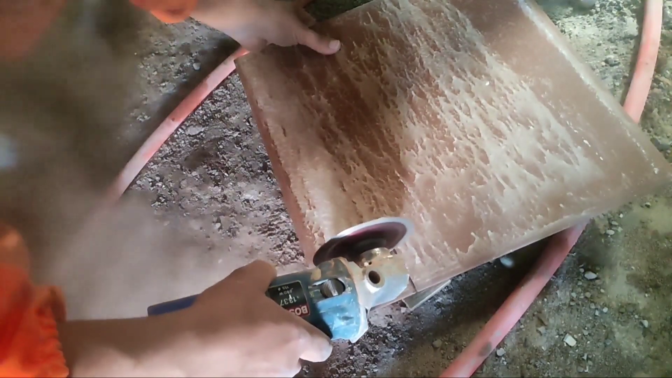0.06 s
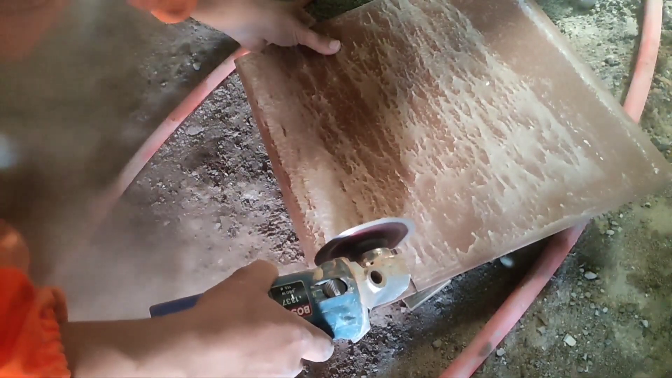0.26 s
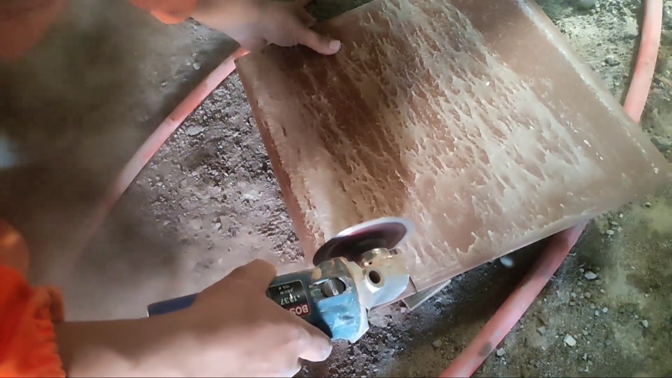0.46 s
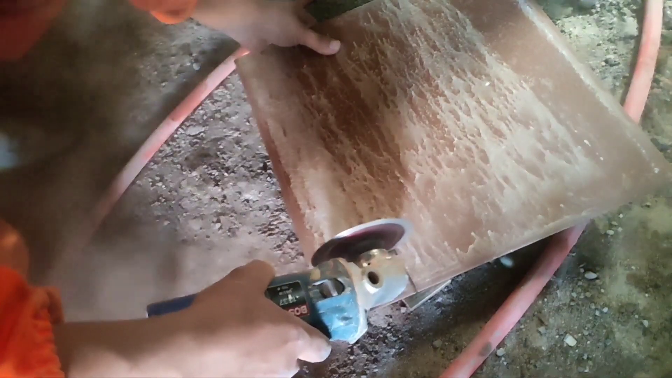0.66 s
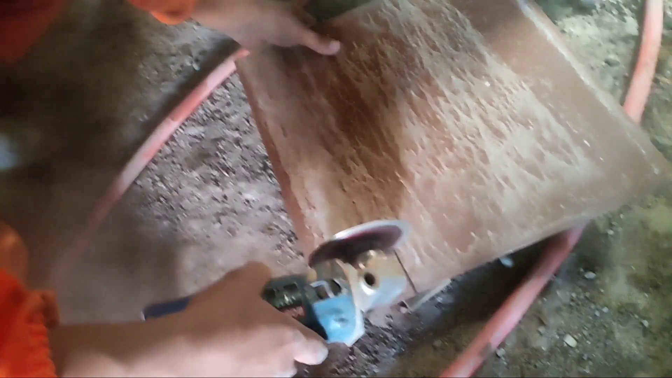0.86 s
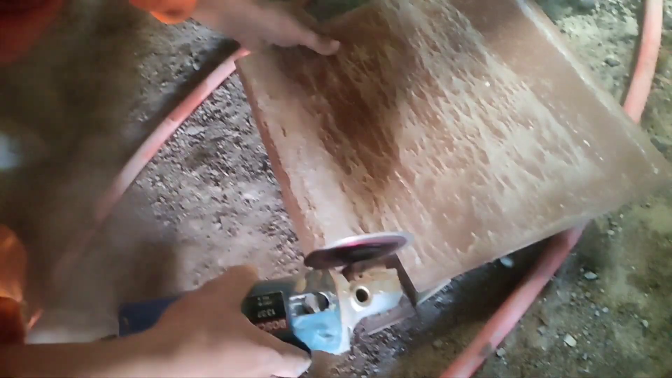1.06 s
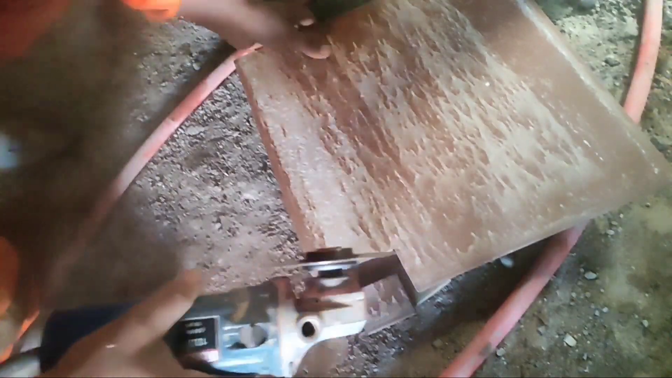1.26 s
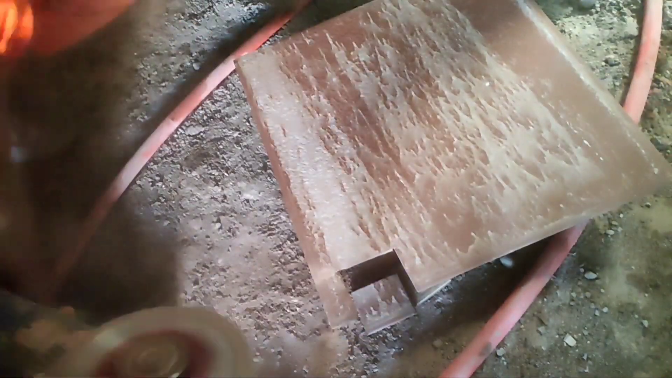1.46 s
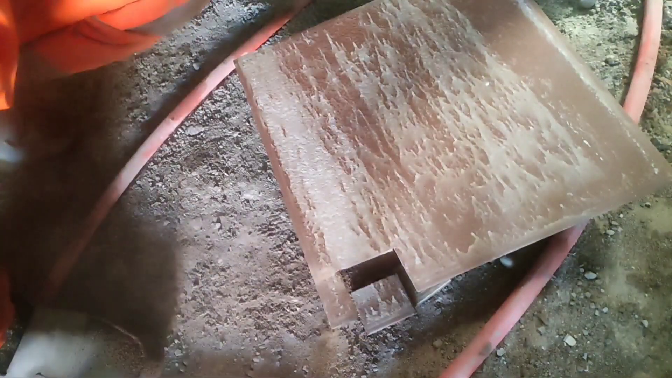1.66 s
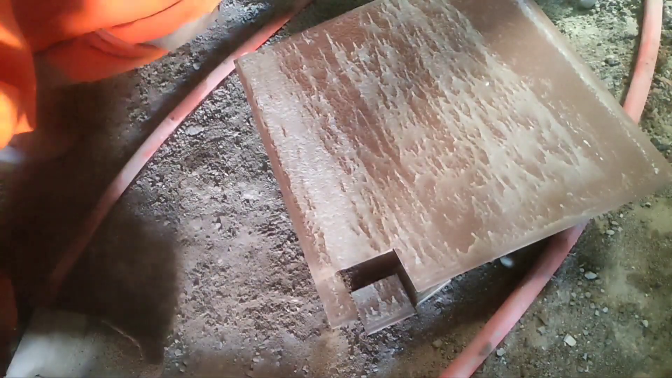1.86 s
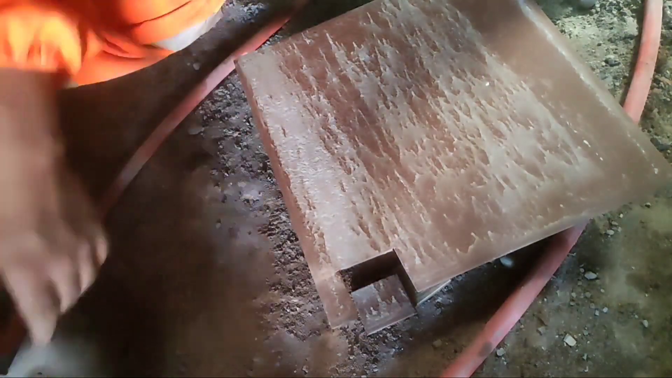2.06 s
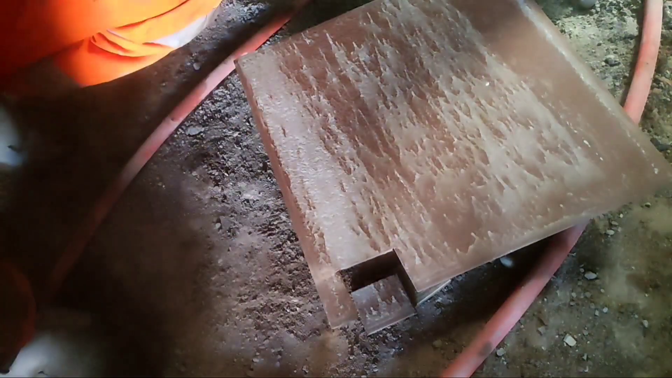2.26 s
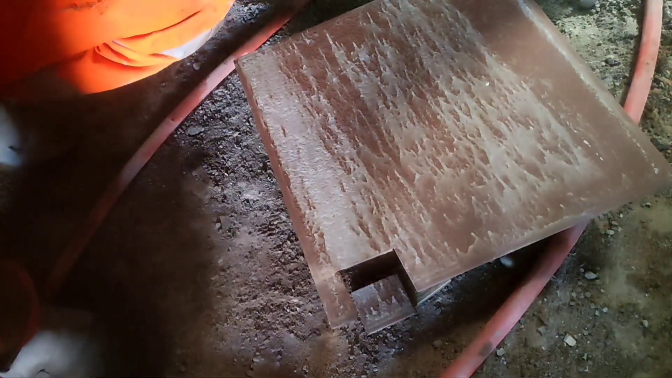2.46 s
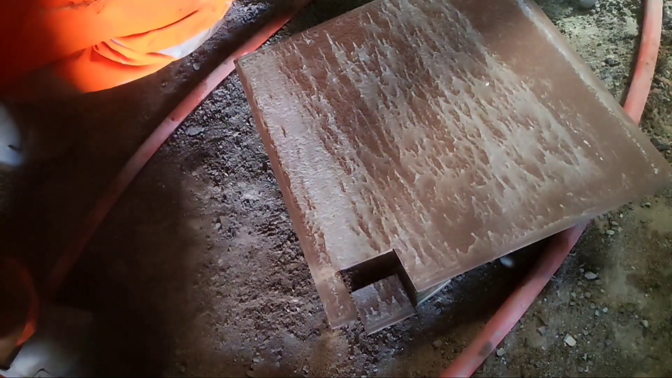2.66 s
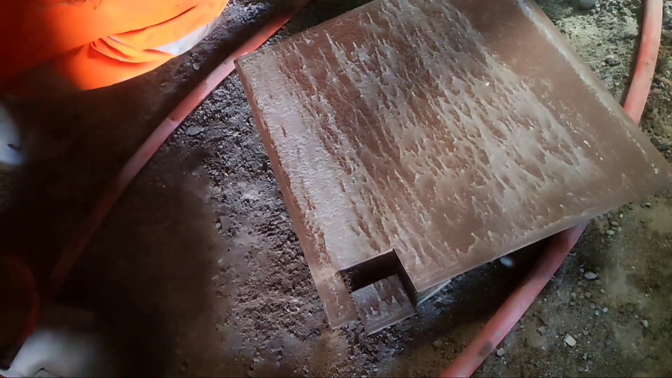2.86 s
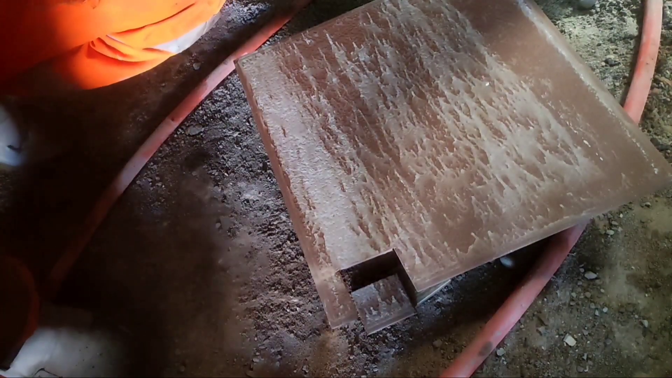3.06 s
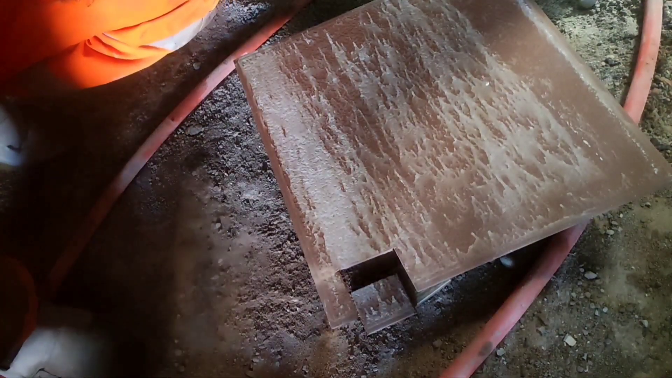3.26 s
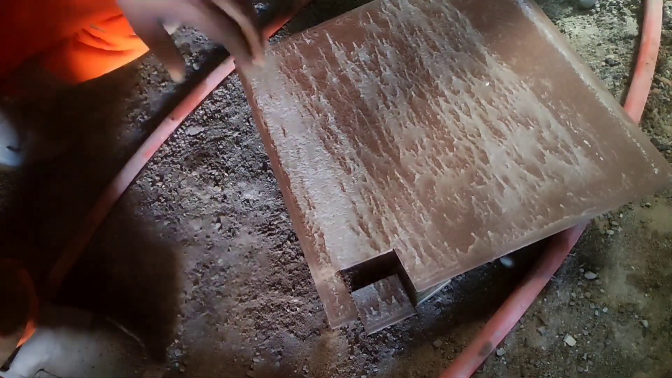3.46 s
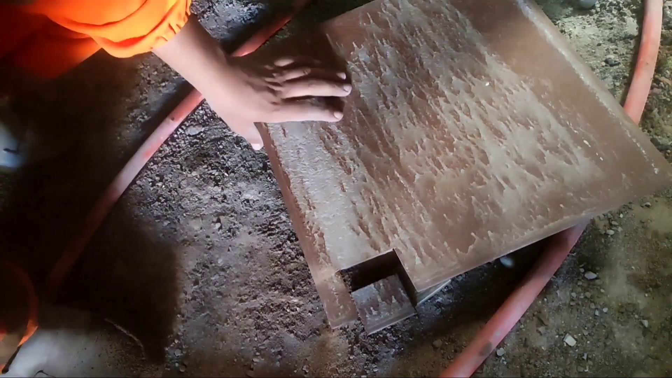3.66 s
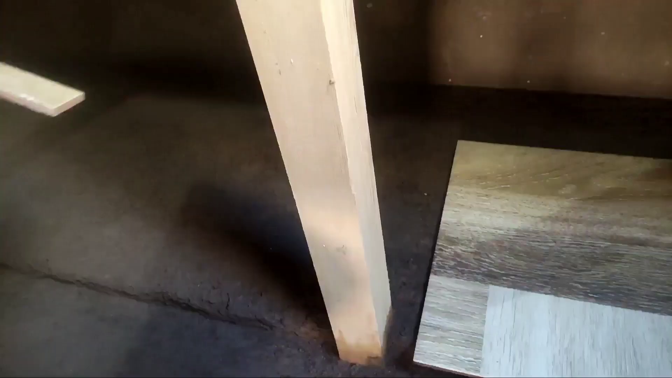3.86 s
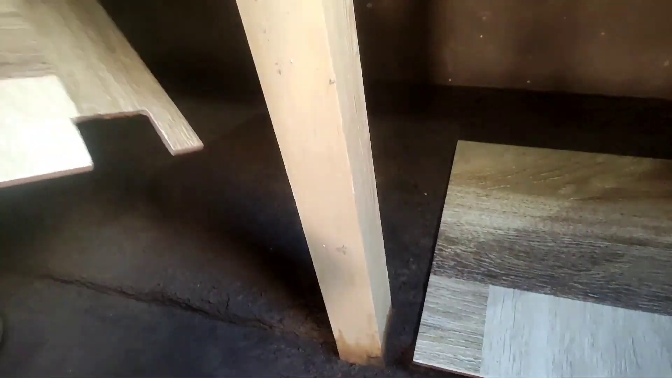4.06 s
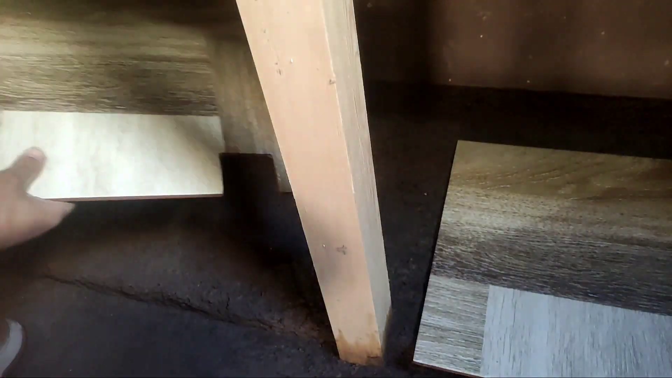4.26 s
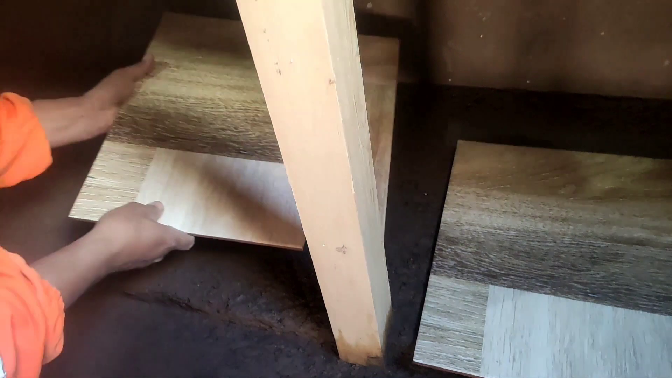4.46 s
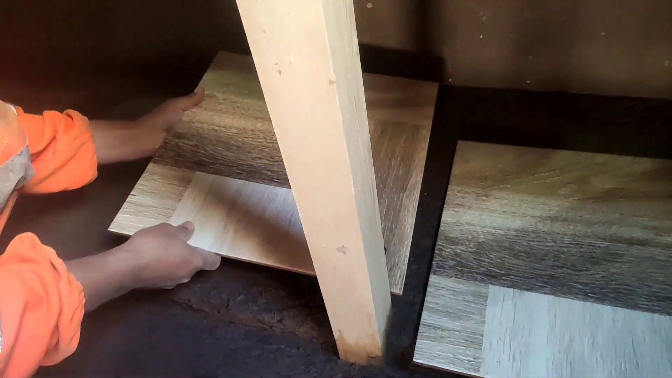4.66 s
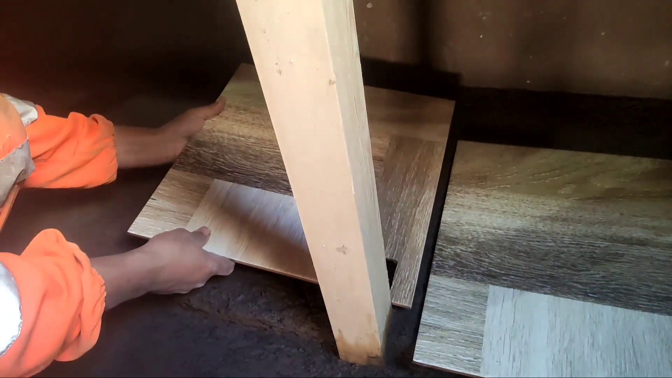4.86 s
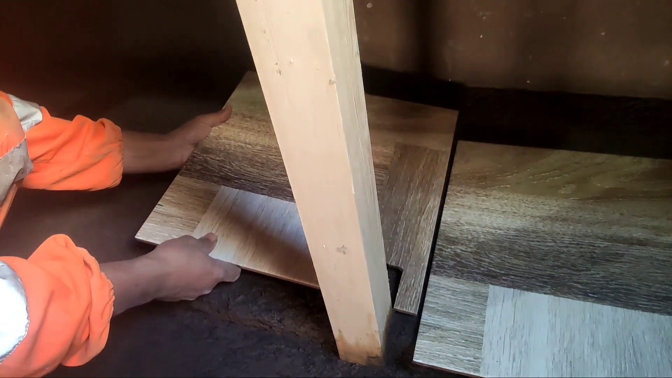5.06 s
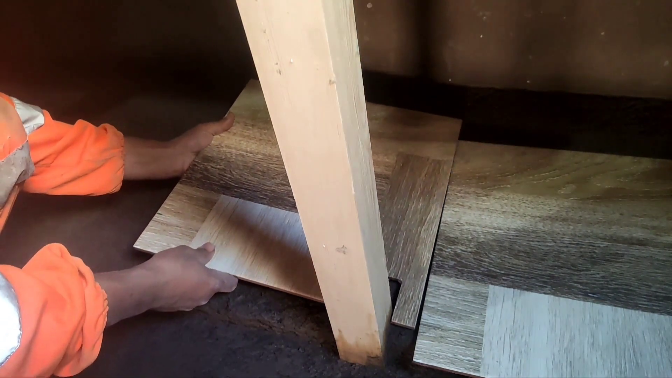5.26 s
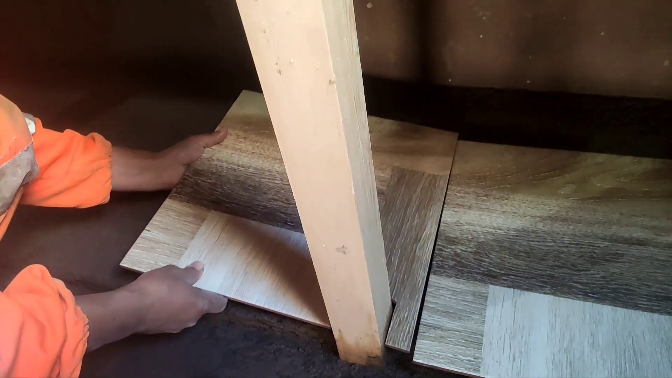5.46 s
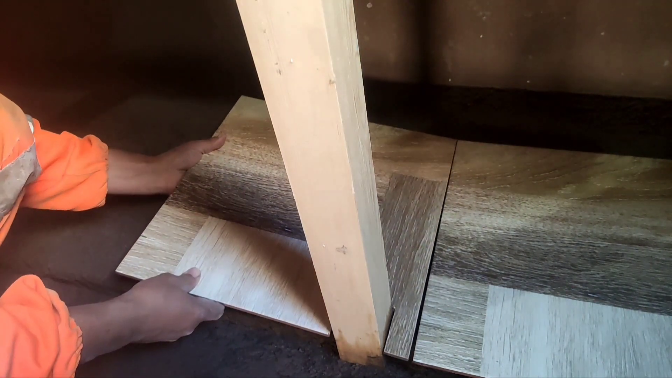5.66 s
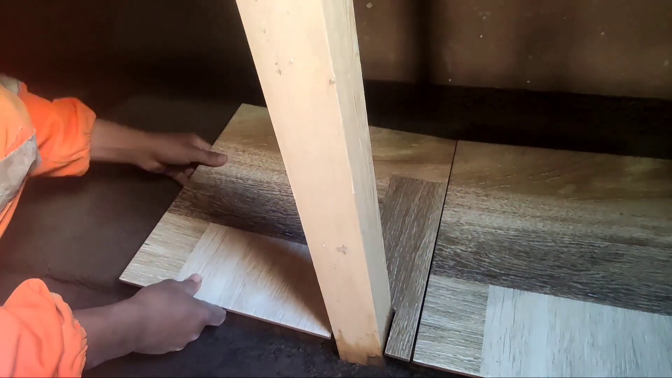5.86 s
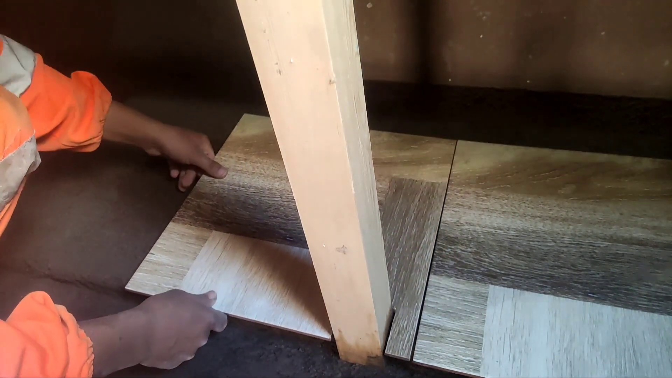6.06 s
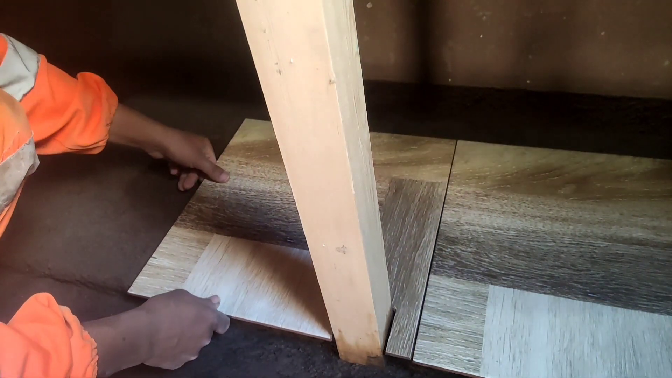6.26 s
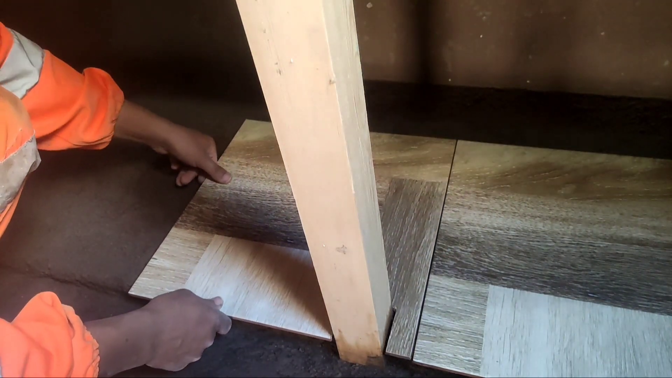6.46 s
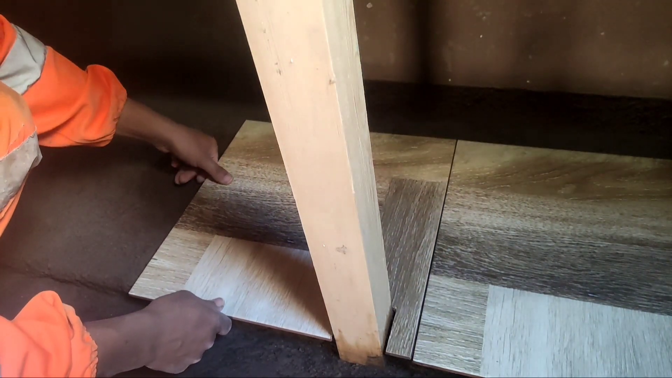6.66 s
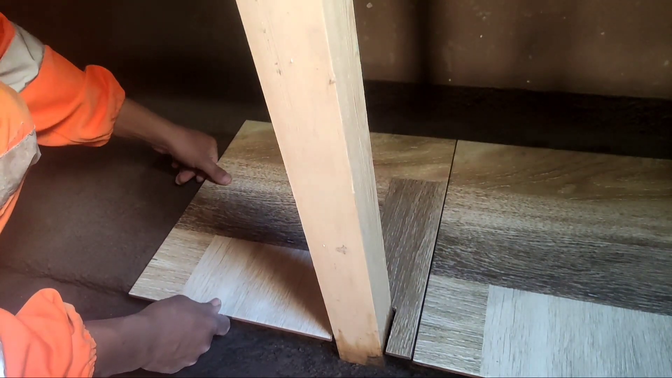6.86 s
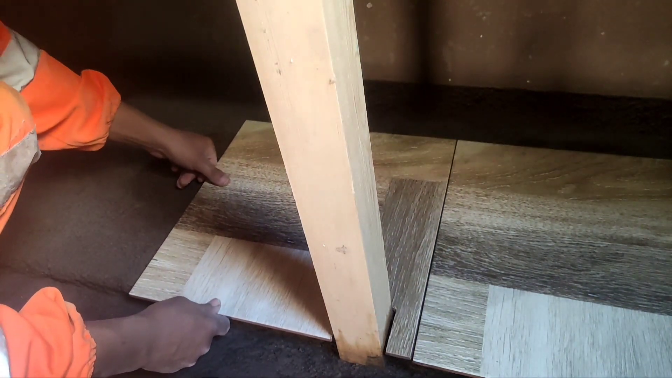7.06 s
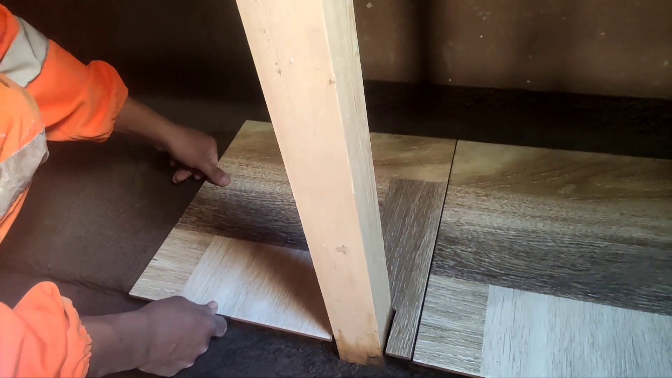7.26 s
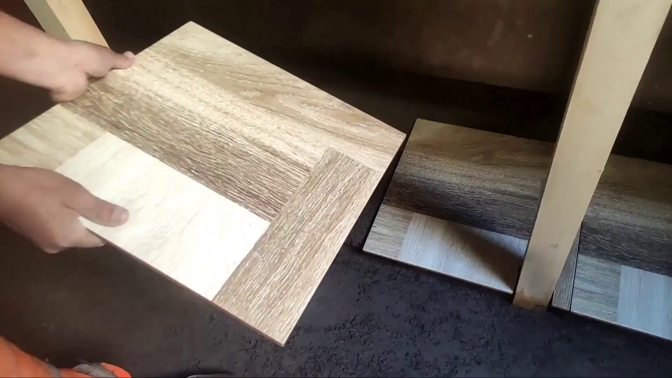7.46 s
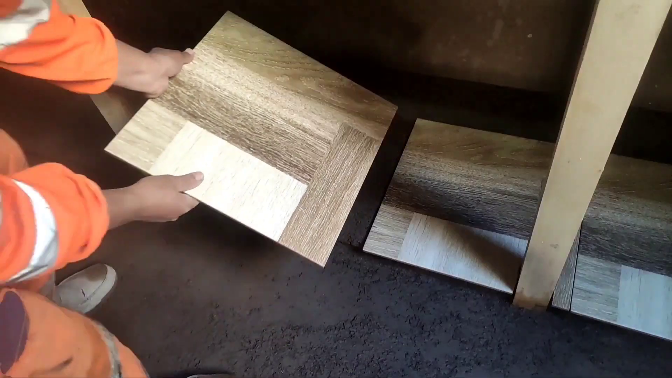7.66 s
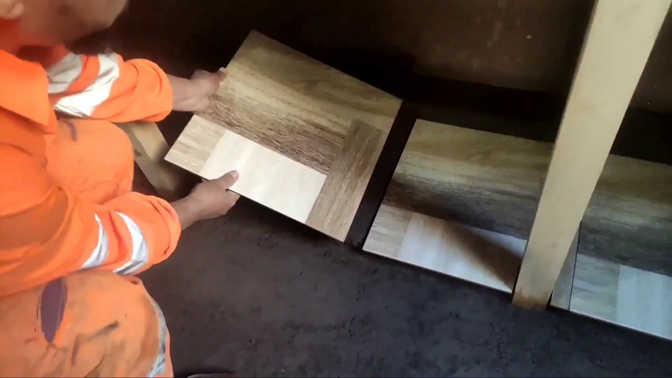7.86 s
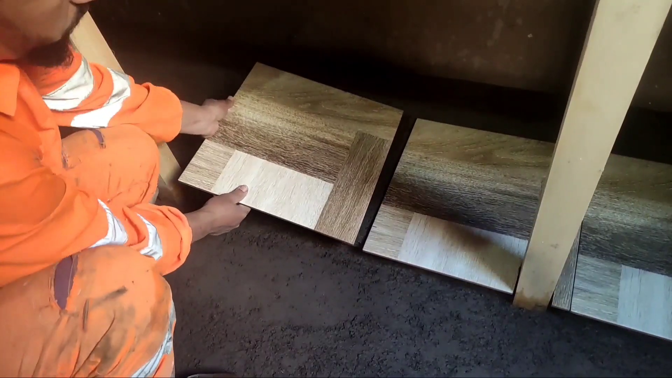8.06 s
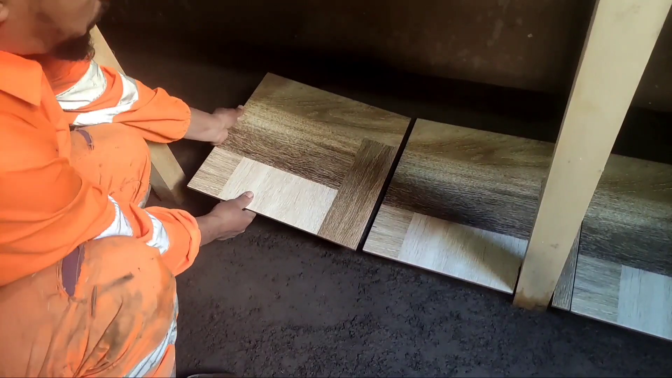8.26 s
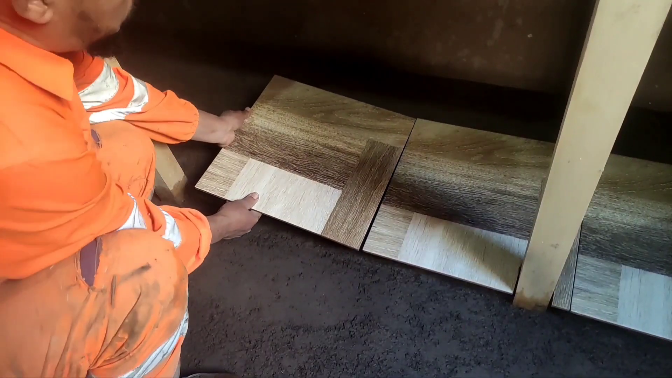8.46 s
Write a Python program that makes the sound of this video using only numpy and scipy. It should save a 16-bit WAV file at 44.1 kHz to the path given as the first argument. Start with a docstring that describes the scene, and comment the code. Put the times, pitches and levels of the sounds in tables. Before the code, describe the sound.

Close to the microphone, an angle grinder rasps loudly through the last of a tile cut and whines freely. Switched off, it falls in pitch, with a few short squeals and a rough hum as the disc brushes the ground. After a sudden change to a slightly echoing concrete room, ceramic tiles scrape and clink softly on the floor, with two spells of faint, high bird chirping.

```python
"""Cutting and laying tiles.

An angle grinder ends a cut in a ceramic tile, runs free, is switched off and spins down on the ground:
grit and cooling air roar, disc and housing resonate, and the motor tones follow the speed of rotation.
Then, in a bare concrete room, tiles are set down, slid and knocked into place, their modes excited
by friction and impact, while small birds twitter."""
import sys
import numpy as np
from scipy import signal
from scipy.fft import rfft, irfft, next_fast_len
from scipy.io import wavfile
from scipy.ndimage import uniform_filter1d

SR = 44100
rng = np.random.default_rng(int(sys.argv[2]) if len(sys.argv) > 2 else 0)


def materialize(psi):
    """Save the field psi as 16-bit PCM at rate SR to the path in sys.argv[1].

    A 1-D psi becomes a single channel; in a 2-D psi each row is a channel.
    """
    bounded = np.clip(np.atleast_2d(psi).T, -1, 1)
    quanta = np.round(bounded * 32767).astype(np.int16)
    wavfile.write(sys.argv[1], SR, quanta)


N = 375732
T = np.arange(N) / SR
ROOM_START_S = 4.143  # the yard gives way to the room


def amp(db):
    """Amplitude ratio of a level in decibels."""
    return 10 ** (np.asarray(db) / 20)


def unit_rms(x):
    """Normalisation to an rms of 1."""
    return x / np.sqrt(np.mean(x ** 2) + 1e-20)


def wobble(shape, samples):
    """Slow random fluctuation: a moving average of white noise, rms 1."""
    return unit_rms(uniform_filter1d(rng.standard_normal(shape), samples))


def ramp(t, start, length):
    """Linear rise from 0 to 1."""
    return np.clip((t - start) / length, 0, 1)


def spectrum(points, hz):
    """Interpolation on a logarithmic frequency axis."""
    f, value = np.transpose(points)
    return np.interp(np.log(hz + 1), np.log(f + 1), value)


def curves(rows, t=T):
    """Linear interpolation of each column in time."""
    times, *columns = np.transpose(rows)
    return [np.interp(t, times, column) for column in columns]


def swells(rows):
    """Power sum of envelopes that rise and decay exponentially."""
    return np.sqrt(sum(amp(db - 20 * np.maximum((s - T) / rise, (T - s) / fall)) ** 2
                       for s, db, rise, fall in rows))


def band(x, lo_hz, hi_hz):
    """Steep band-pass filter."""
    return signal.sosfilt(signal.butter(3, [lo_hz, hi_hz], "band", fs=SR, output="sos"), x)


def resonate(x, hz, width):
    """Resonance by heterodyning: shift hz down to zero, smooth, shift back."""
    carrier = np.exp(2j * np.pi * np.cumsum(hz * np.ones(x.shape[-1])) / SR)
    pole = np.exp(-np.pi * width / SR)
    return 2 * (carrier * signal.lfilter([1 - pole], [1, -pole], x / carrier)).real


def response(hz, modes, order):
    """Summed magnitude response of resonances given as (Hz, width in Hz, dB)."""
    return sum(amp(db) / (1 + (2 * (hz - f) / width) ** 2) ** (order / 2) for f, width, db in modes)


def ringing(modes, length, order=2):
    """Random excitation of fixed resonances, in stereo at rms 1."""
    size = next_fast_len(length)
    gain = response(np.fft.rfftfreq(size, 1 / SR), modes, order)
    return unit_rms(irfft(rfft(rng.standard_normal((2, size))) * gain, size)[:, :length])


# Likeness of the two channels. Each row: frequency in Hz, coherence from 0 to 1.
COHERENCE = [(60, 0.27), (150, 0.9), (380, 1), (950, 0.77), (2400, 0.5), (6000, 0.23), (15000, 0.45)]

def noise(field_db, length, patchy_db, lead):
    """Partly coherent stereo noise of spectrum field_db(hz, s); the left leads by lead(s) seconds."""
    frame_s = np.arange(length // 256 + 5) * 256 / SR
    hz = np.fft.rfftfreq(1024, 1 / SR)[:, None]
    a, b, c, d, patches = rng.standard_normal((len(frame_s), 513, 5)).T
    patches = unit_rms(uniform_filter1d(uniform_filter1d(patches, 8, 0), 10, 1))
    same, left = spectrum(COHERENCE, hz), a + 1j * b
    right = same * left * np.exp(-2j * np.pi * hz * lead(frame_s)) + np.sqrt(1 - same ** 2) * (c + 1j * d)
    frames = np.array([left, right]) * amp(field_db(hz, frame_s) + patchy_db * patches)
    return signal.istft(frames, nperseg=1024, noverlap=768)[1][:, :length]


# Background hush. Each row: frequency in Hz, relative spectral level in dB.
HUSH_SPECTRUM = [(15, -27), (25, 14), (91, -17.5), (136, -11), (246, -19), (445, -14.5), (1050, -21),
                 (1200, -19.5), (1380, -18.5), (1850, -21), (8130, -31), (11800, -39), (15500, -47)]
# Low site noise. Each row: time in seconds, level in dB.
RUMBLE_LEVELS = [(4.14, -66.5), (4.9, -62.5), (5.3, -68), (5.94, -73.5), (6.69, -58), (6.93, -67),
                 (8.09, -68), (8.52, -80)]

def room_tone():
    """Ambient noise: a broadband hush and a narrowband rumble that swells."""
    hush = noise(lambda hz, s: spectrum(HUSH_SPECTRUM, hz), N, patchy_db=5, lead=lambda s: -0.00027)
    low = ringing([(87.5, 19, 7.5), (123, 32, -5)], N)
    return amp(-62) * unit_rms(hush) + amp(curves(RUMBLE_LEVELS)[0]) * (low[0] + 0.17 * low)


# Decay of the concrete room. Each row: frequency in Hz, reverberation time T60 in seconds.
ROOM_DECAY = [(150, 0.7), (600, 0.63), (2500, 0.3), (7000, 0.24), (14000, 0.16)]

def reverberation(x):
    """Convolution with sparse reflections of random sign, each band decaying at its own rate."""
    taps = np.zeros((2, SR))
    arrivals = np.arange(150, SR - 20, 20)
    arrivals = arrivals + rng.integers(0, 20, (2, len(arrivals)))
    np.put_along_axis(taps, arrivals, rng.choice([-1., 1.], arrivals.shape), 1)
    hz, t, bands = signal.stft(taps, SR, nperseg=256)
    same = spectrum(COHERENCE, hz)[:, None]
    bands[1] = same * bands[0] + np.sqrt(1 - same ** 2) * bands[1]
    tail = signal.istft(bands * amp(-60 * t / spectrum(ROOM_DECAY, hz)[:, None]), SR, nperseg=256)[1]
    return signal.fftconvolve(x[None], tail / np.linalg.norm(tail[0]), axes=1)[:, :N]


def chirp(length, pitches_hz):
    """A whistle gliding through three pitches, made hoarse by random amplitude modulation."""
    progress = np.linspace(0, 1, round(length * SR))
    glide = np.polyval(np.polyfit([0, .5, 1], pitches_hz, 2), progress)
    hoarse = 1 + 4 * length ** .5 * wobble(len(progress), 30)
    return hoarse * np.sin(2 * np.pi * np.cumsum(glide) / SR) * np.sin(np.pi * progress) ** .5


# Near bird notes. Each row: start and length in seconds, first and last pitch in Hz, level in dB.
BIRD_NOTES = [(4.163, 0.0099, 6100, 7250, -42), (4.239, 0.0097, 8870, 6630, -36),
              (4.275, 0.012, 6090, 7770, -41), (4.313, 0.021, 11200, 12200, -51),
              (4.34, 0.0094, 7930, 8900, -40.5), (4.344, 0.0056, 8070, 6500, -42),
              (7.367, 0.0187, 7100, 9100, -47.5), (7.452, 0.047, 9480, 7300, -48.5),
              (7.503, 0.069, 7170, 5540, -55), (7.618, 0.014, 9560, 7180, -40),
              (7.634, 0.01, 7210, 9050, -41), (7.665, 0.0053, 7440, 5730, -44)]
# Bouts of far twitter. Each row: peak time in seconds, level in dB, rise and fall in seconds per 20 dB.
FLOCK_BOUTS = [(4.14, -39, 0.064, 0.22), (4.25, -42, 0.049, 0.14), (4.35, -45, .03, 0.34),
               (6.87, -57.5, 0.28, 0.25), (6.99, -56.5, 0.11, 0.15), (7.11, -53, 0.13, 0.094),
               (7.22, -54, 0.11, 0.073), (7.36, -48, 0.16, 0.11), (7.54, -47, 0.11, 0.17),
               (7.624, -41, 0.06, 0.07)]

def birds():
    """Frequency sweeps: single notes nearby, and a dense random superposition farther off."""
    near, far = np.zeros((2, N + SR))
    for s, length, start_hz, end_hz, db in BIRD_NOTES:
        sound = chirp(length, [start_hz, start_hz + 0.54 * (end_hz - start_hz), end_hz])
        near[round(s * SR):][:len(sound)] += amp(db) * sound
    for when, length, pitch, glide in rng.random((900, 4)):
        hz = 5600 + 5600 * pitch ** 1.3 + 2600 * (glide - .6) * np.array([-1, .2, 1])
        sound = chirp(0.0092 + 0.027 * length, hz)
        far[round((1 + when) * N / 2.1):][:len(sound)] += sound
    return near[:N], far[:N] / np.std(far[N // 2:N]) * swells(FLOCK_BOUTS)


# Modes of a tile, slid or knocked. Each row: frequency in Hz, level in dB, T60 in seconds.
TILE_MODES = [(146, -4.5, 0.18), (199, -15.5, 0.21), (294, -8.5, 0.14), (382, -22, 0.43), (406, -9, 0.4),
              (522, -8.5, 0.31), (844, -13, 0.15), (969, -13.5, 0.21), (1093, -13, 0.3),
              (1357, -15.5, 0.42), (1685, -17, 0.1), (2070, -3.5, 0.11), (2422, -2, 0.038),
              (3090, -13, 0.1), (3560, -10, 0.057), (3820, -10, 0.07), (4720, -14, 0.098),
              (5150, -22, 0.09), (6000, -26, 0.091), (7200, -18, 0.08)]
# Grit on concrete. Each row: frequency in Hz, relative spectral level in dB.
GRIT_SPECTRUM = [(88, -37), (150, -1.5), (320, -18), (381, -4), (519, -3), (912, -6), (1800, -5),
                 (2410, -2.5), (3160, -3.5), (4800, -7), (10100, -3.5), (15500, -19)]
# Catches of a sliding tile. Each row: peak time in seconds, level in dB, rise and fall in seconds
# per 20 dB, favoured ring in Hz.
TILE_SLIDES = [(4.15, -53.5, 0.021, 0.13, 969), (4.45, -47, 0.13, 0.42, 382),
               (4.738, -47.5, 0.0086, 0.033, 3560), (5.07, -58.5, 0.037, 0.042, 3560),
               (5.5, -43, 0.038, 0.085, 3820), (5.555, -45, 0.047, 0.091, 3820),
               (5.59, -38, .008, 0.1, 2422), (5.675, -47, 0.075, 0.12, 4720), (5.78, -45, 0.12, 0.11, 3560),
               (5.82, -44.5, 0.092, 0.12, 2422), (6.05, -54.5, 0.035, 0.24, 1093),
               (7.285, -39, 0.015, 0.02, 3560), (7.378, -41.5, 0.024, 0.046, 3090),
               (7.726, -51.5, 0.18, 0.16, 969)]

def slides():
    """Stick-slip friction: clumped grit crackles under the tile and excites its modes."""
    size, before = 65536, 26000
    out, hz, t = np.zeros(N + size), np.fft.rfftfreq(size, 1 / SR), T[:size] - before / SR
    f = np.transpose(TILE_MODES)[0][:, None]
    peaks = 1 / (1 + ((hz - f) / (15 + 0.024 * f)) ** 2)
    for s, db, rise, fall, ring_hz in TILE_SLIDES:
        grit = rng.standard_normal(size)
        for depth_db, samples in ((0.88, 128), (3, 512)):  # clumps of grit, then catching and letting go
            grit *= amp(depth_db * np.minimum(np.repeat(rng.exponential(1, size // samples), samples), 4))
        mode_db = 7 + 5 * np.exp(-(np.log(f / ring_hz) / 0.024) ** 2) + 2 * rng.standard_normal(f.shape)
        colour = amp(spectrum(GRIT_SPECTRUM, hz)) * (1 + (amp(mode_db) * peaks).sum(0))
        rub = unit_rms(irfft(rfft(grit) * colour, size))
        out[round(s * SR) - before:][:size] += amp(db - 20 * np.maximum(-t / rise, t / fall)) * rub
    return out[:N]


# Blows on a tile. Each row: start in seconds, level, bass and treble in dB, first and second favoured
# ring in Hz, factor on T60.
TILE_KNOCKS = [(4.732, -40, -3, -11, 505, 300, 0.9), (4.847, -47.5, -5, -11, 394, 969, 0.77),
               (5.206, -55.5, -13, 1, 1093, 3560, 0.83), (5.246, -39, -11, -1, 404, 3560, 0.7),
               (5.266, -27.5, -17, -7, 969, 1690, 0.27), (5.412, -32, -7.5, -5, 199, 1685, 0.26),
               (5.481, -40, -4.5, 1, 206, 2430, 0.28), (5.502, -39, -12, -9, 3820, 5150, 0.54),
               (5.585, -39, -12, -3.5, 2420, 3820, 0.68), (5.636, -37.5, -7.5, 3.5, 969, 410, 0.27),
               (5.664, -43, -7, -2, 2440, 4720, 0.83), (5.824, -41.5, -15, -3, 2430, 3560, 0.48),
               (6.046, -58, -30, 10, 2420, 3090, 1.3), (6.401, -61, -8, 6, 2430, 3560, 0.22),
               (6.655, -46, -26, 8.5, 2280, 2260, 0.13), (7.178, -36.5, -8, -15, 2100, 1357, 0.098),
               (7.277, -46, -11, 4, 515, 969, 0.34), (7.294, -35.5, -5, -20, 199, 299, 0.32),
               (7.387, -36, -10, -10, 145, 2070, 0.35), (7.455, -50.5, 8.5, -25, 140.2, 198, 0.55),
               (7.719, -50.5, -6, 11.5, 522, 969, 0.29), (8.097, -52.5, -23, 12, 1357, 969, 0.12),
               (8.309, -40.5, -8.5, 8.5, 404, 1357, 0.95)]

def knocks():
    """Impact excitation: a thud, a crack and decaying modes, two favoured by where the blow lands."""
    out, t = np.zeros(N + SR), T[:SR // 2]
    f, mode_db, t60 = np.transpose(TILE_MODES)[:, :, None]
    for s, db, bass_db, treble_db, first_hz, second_hz, sustain in TILE_KNOCKS:
        thud_hz, crack_hz = min(first_hz, 600), np.clip(max(first_hz, second_hz), 1500, 2400)
        tilt_db = bass_db / (1 + (f / 700) ** 4) + treble_db / (1 + (2600 / f) ** 4)
        favour_db = sum(lift_db * np.exp(-(np.log(f / hz) / 0.078) ** 2)
                        for hz, lift_db in ((first_hz, 17), (second_hz, 12)))
        held_db = -2 / (1 + (f / (0.7 * thud_hz)) ** 8)  # hands hold down the lowest modes
        scatter, detune = rng.standard_normal((2, len(f), 1))
        decays = amp(mode_db + tilt_db + favour_db + held_db + 3.7 * scatter - 60 * t / (t60 * sustain))
        ring = (decays * np.sin(2 * np.pi * f * (1 + 0.0043 * detune) * t)).sum(0)
        shock, tick = rng.standard_normal(len(t)), 6 * (t == t[20])
        burst = (shock + tick) * np.exp(-t / 0.003) * ramp(t, 0, .0007)
        crack = 4 * band(burst, 0.59 * crack_hz, 1.34 * crack_hz)
        crack += 1.19 * amp(treble_db) * band(burst, 2650, 9500)
        thud = band(shock * np.exp(-t / 0.018), 0.71 * thud_hz, 1.7 * thud_hz)
        out[round(s * SR):][:len(t)] += amp(db) * (amp(-4.5) * ring + crack + 4.1 * amp(bass_db) * thud)
    return out[:N]


# The grinder under power. Each row: time in seconds, twice the disc's rotation rate in Hz.
DRIVE_SPEED = [(0, 236.7), (.3, 239.8), (.42, 266.5), (.72, 272.2), (1.03, 288.5), (1.42, 310),
               (1.7, 318.2), (1.87, 319)]
OFF_S, COAST_PER_S = 1.87, .545

def fundamental(t):
    """Twice the disc's rotation rate: driven, then decaying exponentially and dragged by the ground."""
    drag = 1 - .055 * ramp(t, 3.36, 0.18)
    return curves(DRIVE_SPEED, t)[0] * np.exp(-COAST_PER_S * np.maximum(t - OFF_S, 0)) * drag


# Resonances of the hum. Each row: frequency and width in Hz, level in dB.
HUM_MODES = [(327, 37, 3), (282, 28, -5.5), (232, 18, -6)]
# Its swells. Each row: peak time in seconds, level in dB, rise and fall in seconds per 20 dB.
HUM_BOUTS = [(2.5, -46, 0.078, 0.094), (3.63, -49, 0.14, 1.2), (3.95, -53, .3, 1.6)]

def ground_hum(t):
    """Narrowband noise: the slow grinder hums roughly against the ground."""
    hum = ringing(HUM_MODES, len(t))
    return swells(HUM_BOUTS)[:len(t)] * (hum[0] + 0.088 * hum)


# Brushes with the ground. Each row: start and length in seconds, pitch in Hz, level in dB.
GROUND_SQUEALS = [(2.633, 0.087, 3898, -28.5), (3.081, 0.041, 3920, -37.5), (3.581, 0.075, 3910, -40.5),
                  (3.682, 0.069, 3866, -42)]

def squeals(t, wander):
    """Friction-induced vibration: the coasting disc squeals and scuffs on the ground."""
    out = np.zeros((2, len(t)))
    for s, length, f, db in GROUND_SQUEALS:
        ring = ringing([(f, 70, 0), (1.2 * f, 200, -12), (0.86 * f, 200, -12)], len(t))
        scuff = amp(-2.5) * ringing([(3800, 5140, 0)], len(t), order=4)
        tone = np.sin(2 * np.pi * f * t + 1.93 * wander)
        out += amp(db) * (0.5 * ring + tone + scuff) * np.sqrt(np.sin(np.pi * ramp(t, s, length)))
    return out


# Modes of the strip being cut off. Each row: frequency and width in Hz, level in dB, end of the ring
# and end of its swell in seconds.
STRIP_MODES = [(1018, 4.7, -32.5, 0.36, 0.14), (1214, 13, -38.5, 0.24, 0.085), (1439, 60, -43.5, 0.25, .1),
               (2350, 30, -41, 0.28, 0.04), (2120, 37, -42.5, 0.5, 0.28), (750, 51, -53, 0.3, 0.098)]

def tile_strip(t):
    """Forced vibration: the clamped strip of tile sings until it comes loose."""
    rise_db_per_s, fade_s = 38, 0.11
    out = np.zeros((2, len(t)))
    for f, width, db, end_s, peak_s in STRIP_MODES:
        fuzz = min(width / 25, 2) * ringing([(f, width, 0)], len(t))
        swell = amp(db - rise_db_per_s * np.maximum(peak_s - t, 0))
        out += swell * (np.sin(2 * np.pi * f * t) + fuzz) * np.clip((end_s - t) / fade_s, 0, 1)
    return out


# Housing resonances that the whine sweeps through. Each row: frequency and width in Hz, level in dB.
WHINE_MODES = [(11230, 470, -42.5), (7940, 1200, -48.5), (6630, 570, -43), (4655, 1100, -45)]
BARS, ROTOR = 35.2, 1.64  # commutator tone and rotor speed as multiples of the fundamental

def commutator_whine(t, hz, cycles, wanders):
    """Modulation: unequal bars add sidebands to the whine, which shakes the housing into a rasp."""
    out = np.zeros((2, len(t)))
    for side, wander in zip((-1, 0, 1), wanders):
        multiple = BARS + side * ROTOR
        gain = response(multiple * hz, WHINE_MODES, order=4) * amp(wander - 2 * abs(side))
        brush_chatter = 1 + 1.8 * wobble(len(t), 90)
        tone = np.sin(2 * np.pi * multiple * cycles + [[0], [side]])
        out += gain * brush_chatter * tone * amp([[-3], [3]])
    throb = amp(12) * np.exp(0.92 * (np.cos(np.pi / 2 * cycles) - 1))  # every second disc turn
    for f, width, db in WHINE_MODES:
        gain = response(BARS * hz, [(f, 0.76 * width, db)], order=6)
        out += throb * gain * ringing([(f, 0.81 * width, 0)], len(t)) * amp([[-2], [2]])
    return out


# Tones of disc and gears, the fourth from the rotor. Each entry: a multiple of the fundamental.
TONE_MULTIPLES = [1, 2, 3, 3.28, 5]
# Strength of those tones. Each entry: base level in dB.
TONE_BASE_DB = [-55, -49, -50, -46, -51.5]
# Their swelling. Each row: time in seconds, then gain in dB of multiple 1, of 3 and 5, of 2, of the rotor.
TONE_GAINS = [(0, -17, -8, -8, 7), (.3, -18, -18, -18, -4.5), (.7, -10.5, -8, -19.5, -1),
              (.83, 3, 4, 5, 1.5), (1.03, 1, -2.5, -6.5, -8.5), (1.3, -2.5, 6, -16.5, 6.5),
              (1.42, -5, -6.5, 4.5, 12), (1.6, -3.5, -7.5, 5, 9), (1.7, -2.5, 4, 3.5, -1),
              (1.87, 1, 2, 5.5, 7.5), (2, -2, -0.5, 0, -0.5), (2.15, -5.5, 3.5, -3, 9),
              (2.33, -11, -5, -13, 9.5), (2.5, -5, -11, -10, -1.5), (2.75, -6, -8.5, -21, -7),
              (3, -18, -7, -16, -7), (3.2, -4, -10, -6, -6.5), (3.48, 8, -9, 2, -8),
              (3.62, -7, -5, -5.5, -9), (4.14, -1, -3, -17, -10)]
# Resonances of the grinder's body. Each row: frequency and width in Hz, gain in dB.
BODY_MODES = [(157, 43, 3), (199, 14, 4.5), (247, 34, -0.5), (319.3, 58, -1.5), (614, 110, 3.5),
              (964, 152, 5.5), (1410, 200, 7.5)]
LEAD_S = .0001  # the grinder's sound reaches the left channel first

def motor_tones(t, hz, cycles, wanders):
    """Rotational tones, each reinforced as it crosses a resonance of the body."""
    first_db, odd_db, second_db, rotor_db = curves(TONE_GAINS, t)
    own_db = np.array(TONE_BASE_DB)[:, None] + [first_db, second_db, odd_db, rotor_db, odd_db]
    body = 0.22 + response(np.outer(TONE_MULTIPLES, hz), BODY_MODES, order=2)
    gains = amp(own_db + 3.5 * np.log2(hz / hz.max())) * body  # 3.5 dB per doubling of speed
    rough_db = 1.9 + 3.3 * ramp(t, 2.6, 0.6)  # the tones break up as the disc slows
    stereo_cycles = cycles + np.outer([LEAD_S, 0], hz)
    out = np.zeros((2, len(t)))
    for multiple, gain, wander in zip(TONE_MULTIPLES, gains, wanders):
        phase = 2 * np.pi * multiple * stereo_cycles + 0.25 * rough_db * wander[::-1]
        out += np.sqrt(2) * gain * amp(rough_db * wander) * np.sin(phase)
    return out * amp([[0.5], [-0.5]])


# The disc in the tile. Each row: time in seconds, contact from 0 to 1.
DISC_CONTACT = [(0, 1), (1.08, 1), (1.16, 0), (4.14, 0)]
# Modes of the steel disc. Each row: frequency and width in Hz, level in dB, peak time in seconds.
DISC_MODES = [(3354, 41, -9.5, .9), (3580, 32, -5.5, .15), (3910, 44, -8, 0.86), (4320, 66, -8, .55),
              (4940, 25, -7, 0.11), (7090, 59, -13, .1), (7090, 67, -6.5, 0.4), (7980, 32, -9.5, 0.69),
              (9140, 30, -10, .55), (9220, 30, -8, .15), (9620, 45, -8, 1), (10150, 33, -2, 0.61),
              (11130, 97, -7.5, .4), (11550, 36, -8, .15), (12500, 150, -9.5, .9)]

def disc_ring(t):
    """Modal response to the cut: each mode drifts, flutters and stands out briefly as the disc sinks in."""
    out = np.zeros((2, len(t)))
    cut = round(DISC_CONTACT[2][0] * SR)  # samples until the disc is clear
    for f, width, db, peak_s in DISC_MODES:
        drift, flutter = wobble((2, cut), 1800)
        ring = unit_rms(resonate(rng.standard_normal((2, cut)), f * (1 + 0.0018 * drift), width))
        moment_db = 6 * (np.exp(-((t[:cut] - peak_s) / .25) ** 2) - 1)
        out[:, :cut] += amp(db + moment_db + 2 * flutter) * ring
    return out


# The disc in the tile, in the air and slow on the ground. Each row: frequency in Hz, spectral level in dB.
CUT_SPECTRUM = [(18, -45), (30, -18.5), (221, -36), (280, -21.5), (499, -33.5), (554, -19), (649, -20.5),
                (1010, -14.5), (1100, -7), (4420, -1), (6500, -11), (8520, -19.5), (10200, -13.5),
                (16000, -22)]
FREE_SPECTRUM = [(18, -73), (30, -31), (141, -34.5), (311, -18.5), (394, -21), (616, -10.5), (684, -9.5),
                 (1010, -10), (1100, -4.5), (4530, -3), (11100, -10.5), (14800, -23.5), (16000, -41.5)]
COAST_SPECTRUM = [(18, -30), (30, -9.5), (86, -17), (319, -16), (404, -12), (1350, -4.5), (3310, -6),
                  (4650, -4), (10800, -14), (13700, -35.5), (16000, -71)]
# Course of the roar. Each row: time in seconds, then in dB the level, the bass gain, the treble's
# left-right difference and the gain of the housing as it turns to the ear.
ROAR_COURSE = [(0, -32.5, 6, 5.5, -1.5), (1.08, -33.5, 9.5, 2, -1.5), (1.12, -38.5, 6.5, 3, -2),
               (1.23, -28, -0.5, 6, -3), (1.6, -27.5, -0.5, 8, -4), (1.98, -29.5, 1.5, 7.5, -1),
               (2.24, -33, 4, 2.5, -3), (2.62, -33, 4, 5, -13), (2.8, -32, 2, 4, -15),
               (3.05, -36.5, -4, 0.5, -12), (3.25, -35.5, -3, 1, -9), (3.32, -35, 2, 0.5, -8),
               (3.95, -40.5, -2.5, 2, -6), (4.0, -43.5, -3.5, 5, -12), (4.11, -41.5, -8.5, 2.5, -3),
               (4.14, -43, -0.5, 2.5, -11)]

def roar_spectrum(hz, s):
    """Time-varying noise spectrum in dB per channel, blended by contact and speed."""
    (touch,), (_, bass_db, pan_db, _) = curves(DISC_CONTACT, s), curves(ROAR_COURSE, s)
    slow = np.clip((230 - fundamental(s)) / 70, 0, 1)
    db = touch * spectrum(CUT_SPECTRUM, hz) + slow * spectrum(COAST_SPECTRUM, hz)
    db += (1 - touch - slow) * spectrum(FREE_SPECTRUM, hz)
    db += bass_db / (1 + (hz / 1200) ** 4) + 5.5 / (1 + (6500 / (hz + 1)) ** 4)  # bass and treble shelves
    # the hiss surges around the switch-off
    db += 7 * np.exp(-((s - 1.93) / 0.22) ** 2 - (np.log((hz + 1) / 5000) / 0.31) ** 2)
    ridges = wobble(len(hz), 3)[:, None]  # many small disc modes comb the treble of the cut
    db += 4.5 * touch * ridges / (1 + (5200 / (hz + 1)) ** 6)
    return db + np.reshape([.5, -.5], (2, 1, 1)) * pan_db / (1 + (1800 / (hz + 1)) ** 2)


# Housing resonances heard out of the cut. Each row: frequency and width in Hz, relative level in dB.
HOUSING_MODES = [(2360, 120, 12.5), (3997, 42, 19.5), (4420, 55, 18.5), (6900, 28, 8), (8800, 31, -2)]

def roar(t, cycles):
    """Broadband noise of grit and cooling air, with the resonances of housing and disc."""
    def lead(s):
        """Arrival-time difference as the grinder is lifted and swings past."""
        return LEAD_S * ramp(s, 1.3, 0.27) * (1 + .5 * np.exp(-((s - 1.75) / 0.22) ** 2))

    (touch,), (level_db, _, pan_db, facing_db) = curves(DISC_CONTACT, t), curves(ROAR_COURSE, t)
    air = noise(roar_spectrum, len(t), patchy_db=2.5, lead=lead)
    air /= np.std(resonate(air[1], hz=3600, width=3760))
    housing = (1 - touch) * ringing(HOUSING_MODES, len(t), order=1)
    housing *= amp(facing_db + np.outer([.5, -.5], pan_db))
    # once a turn the disc bites unevenly or, later, thumps the ground
    thump = 1 + (.12 * touch + 0.18 * ramp(t, 2.9, 0.21)) * np.cos(np.pi * cycles)
    return amp(level_db) * thump * (amp(1.5) * air + housing) + amp(-31) * touch * disc_ring(t)


def grinder():
    """Superposition of the grinder's sources; roar, tones and whine share one phase of rotation."""
    t = T[:round(ROOM_START_S * SR)]
    hz, wanders = fundamental(t), wobble((12, len(t)), 1500)
    cycles = np.cumsum(hz + .4 * wanders[0]) / SR  # the gears run unevenly
    out = roar(t, cycles) + tile_strip(t) + ground_hum(t)
    out += motor_tones(t, hz, cycles, wanders[1:6])
    out += commutator_whine(t, hz, cycles, wanders[6:9])
    out += squeals(t, wanders[11])
    fade = np.clip((ROOM_START_S - t) / 0.0012, 0, 1)
    return np.pad(out * fade, ((0, 0), (0, N - len(t))))


def scene():
    """The grinder in the yard, then direct and reverberant sound in the room."""
    blows, grit, (near, far) = knocks(), slides(), birds()
    # the left channel lags by a few samples; from 7 s on the tile is nearly straight ahead
    left_blows = np.where(T < 7, np.roll(blows, 8), np.roll(blows, 2))
    direct = np.array([left_blows + 0.5 * np.roll(near, 8), blows + 1.56 * near]) + 0.55 * grit
    tiles = amp(-5) * blows + amp(-8.5) * band(blows, 1810, 22000) + amp(-8) * grit
    reflected = reverberation(tiles + amp(3) * near + amp(-4.5) * far)
    return grinder() + (direct + reflected + room_tone()) * (T > ROOM_START_S)


# Channel balance. Each row: frequency in Hz, level of left against right in dB.
LEFT_BALANCE = [(60, -3.5), (150, 0), (380, -1), (950, -0.5), (2380, -3), (5980, -10.5), (15000, -11.5)]

def record(dry):
    """Linear filtering: the left channel is duller than the right, and both are band-limited."""
    hz = np.linspace(0, SR / 2, 257)
    tilt_db = spectrum(LEFT_BALANCE, hz) / 2
    filters = np.array([signal.firwin2(255, hz, amp(side * tilt_db), fs=SR) for side in (1, -1)])
    heard = signal.oaconvolve(dry, filters, "same", axes=1)
    low_pass = signal.firwin(511, 15900, window=("kaiser", 9), fs=SR)
    return signal.oaconvolve(heard, low_pass[None], "same")


dry = scene()
out = record(dry)
materialize(out)
```